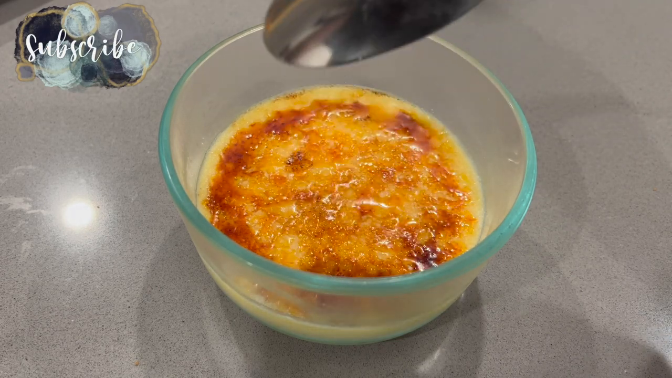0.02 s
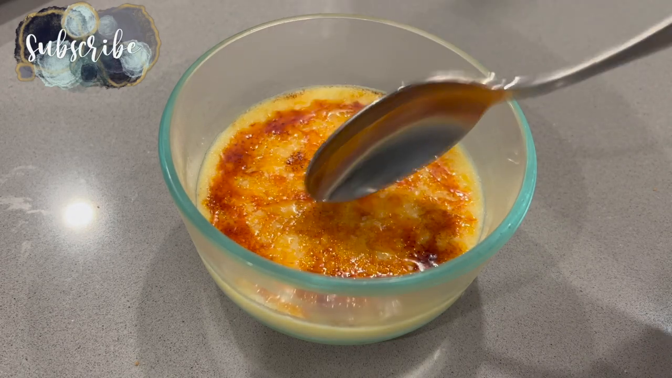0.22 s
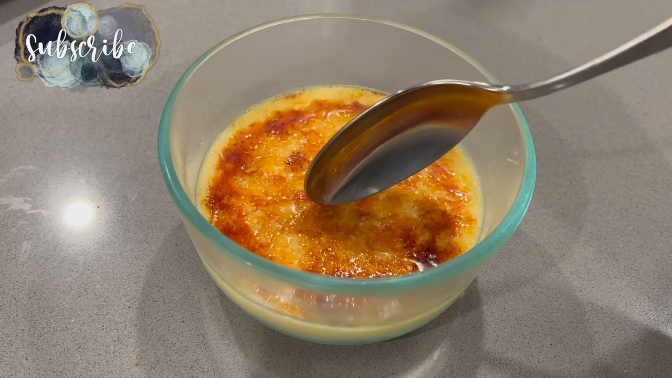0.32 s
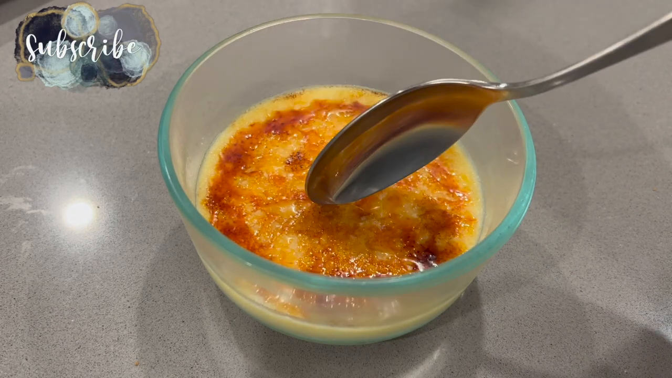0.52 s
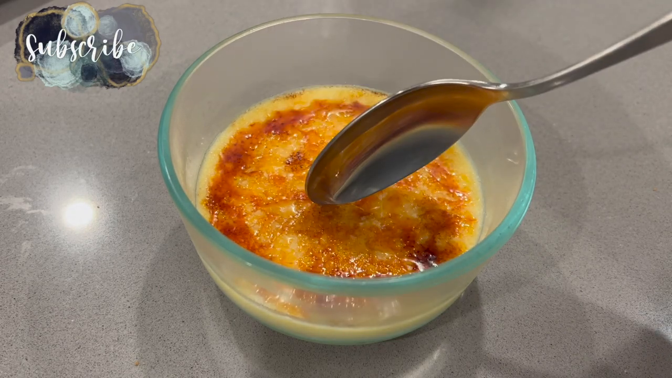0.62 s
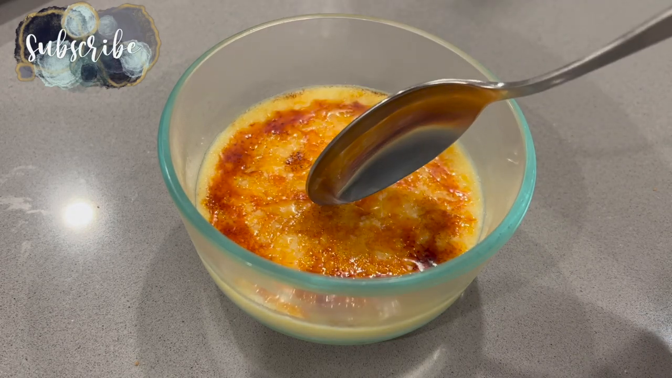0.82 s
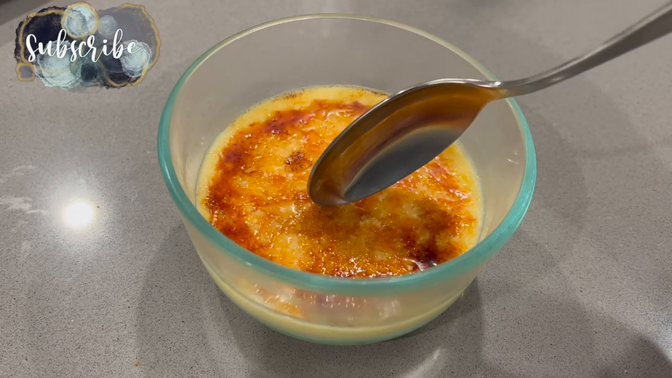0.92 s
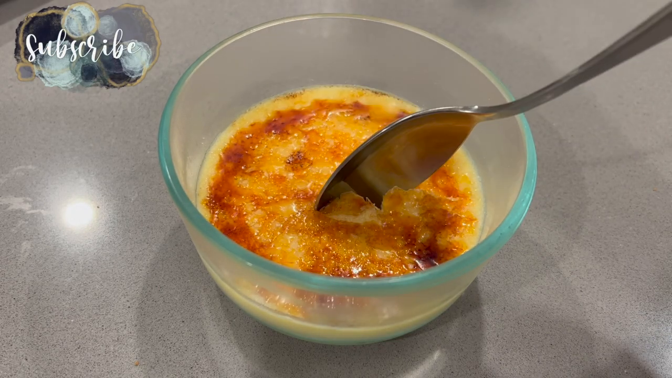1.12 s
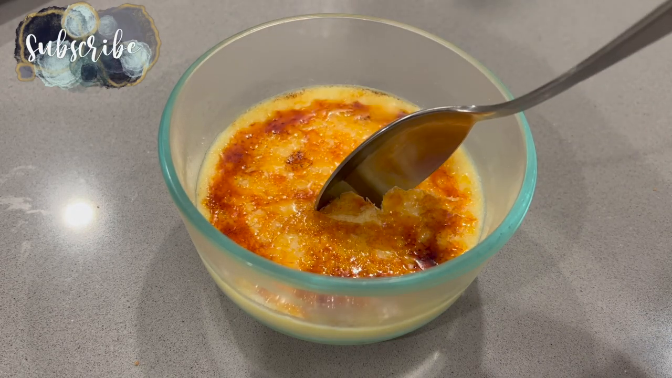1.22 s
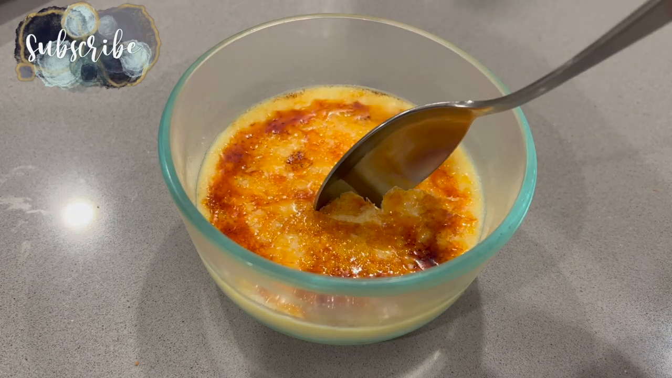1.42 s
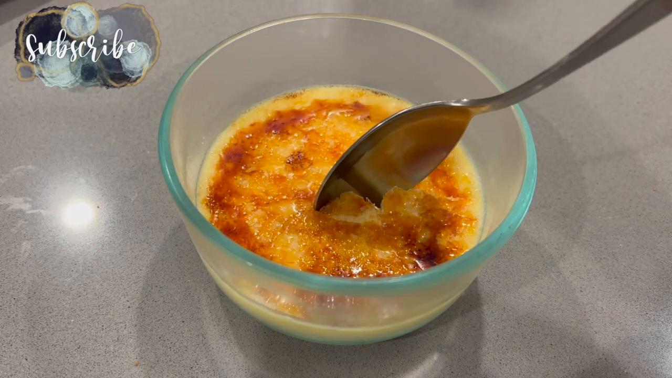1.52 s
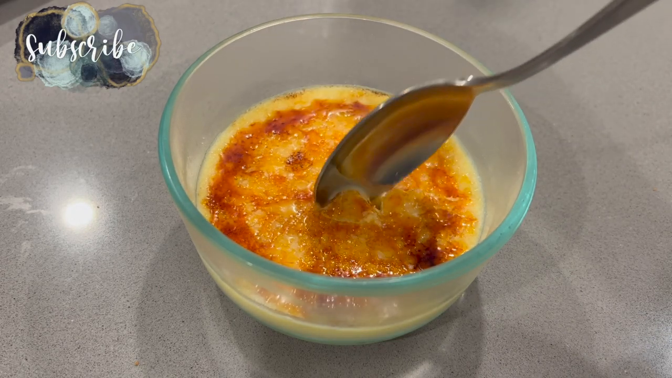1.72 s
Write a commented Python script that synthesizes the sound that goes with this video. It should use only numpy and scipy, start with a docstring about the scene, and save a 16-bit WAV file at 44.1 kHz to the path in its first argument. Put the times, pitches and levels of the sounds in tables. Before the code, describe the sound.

Close up in a lightly reverberant kitchen, a spoon knocks once on hard sugar over custard, presses with tiny crackles, then breaks it in a short crunch ending in a loud snap, over soft low appliance rush.

```python
"""A low appliance rush and hum run throughout; the kitchen answers the spoon and crust with echoes and a tail.
A steel spoon taps the caramel crust of a custard in a glass bowl, close by: crack, hollow knock and bowl thud.
It then presses on the sugar, which ticks and crackles as noise cracks, damped modes and random grains.
The crust breaks through in a short crunch of quick blows that ends in one sharp snap.
Two faint ticks follow near the end."""
import sys
import numpy as np
from scipy import signal
from scipy.fft import rfft, irfft, next_fast_len
from scipy.io import wavfile
from scipy.ndimage import map_coordinates

SR = 44100
rng = np.random.default_rng(int(sys.argv[2]) if len(sys.argv) > 2 else 0)


def dump(signal):
    """Clip the signal to [-1, 1] and save it as 16-bit WAV at the path in sys.argv[1]."""
    limited = np.clip(np.atleast_2d(signal).T, -1, 1)
    pcm = np.round(limited * 32767).astype(np.int16)
    wavfile.write(sys.argv[1], SR, pcm)


N = 77175  # length in samples


def amp(db):
    """Decibels to a linear gain."""
    return 10 ** (np.asarray(db) / 20)


def unit(x):
    """Scaled to rms 1."""
    return x / np.sqrt(np.mean(x ** 2) + 1e-20)


def burst(x):
    """Scaled to an energy of 1 per channel, averaged over the channels."""
    return unit(x) / np.sqrt(x.shape[-1])


def along(points, hz):
    """Reads (frequency [Hz], value) points on a log frequency axis."""
    f, v = np.transpose(points)
    return np.interp(np.log(hz + 1), np.log(f + 1), v)


def filtered(x, response):
    """x times a response of frequency."""
    n = x.shape[-1]
    padded = next_fast_len(n + 8192)
    spectrum = rfft(x, padded) * response(np.fft.rfftfreq(padded, 1 / SR))
    return irfft(spectrum, padded)[..., :n]


def coloured(x, points):
    """x shaped by a (frequency [Hz], level [dB]) curve."""
    return filtered(x, lambda hz: amp(along(points, hz)))


def low_cut(x, hz):
    """A second-order high-pass."""
    return signal.sosfilt(signal.butter(2, hz, "highpass", fs=SR, output="sos"), x)


def spread(pair, width):
    """Two unrelated signals as left and right; width 0 is mono."""
    mid, side = pair[0] * np.cos(width), pair[1] * np.sin(width)
    return np.array([mid + side, mid - side])


def widened(pair, widths):
    """Like spread, with a width for each frequency."""
    def mid_side(hz):
        width = along(widths, hz)
        return np.array([np.cos(width), np.sin(width)])
    mid, side = filtered(pair, mid_side)
    return np.array([mid + side, mid - side])


def wobble(rate):
    """A smooth random curve, rate knots a second."""
    knots = rng.standard_normal(int(N * rate / SR) + 4)
    return map_coordinates(knots, [np.arange(N) * rate / SR])


def ring(modes, t, rise_s, pitch=1):
    """Damped modes struck at t = 0, each a sine that dies away at its own rate."""
    t = np.maximum(t, 0)
    tone = sum(amp(db - 60 * t / t60) * np.sin(2 * np.pi * hz * pitch * t) for hz, db, t60 in modes)
    return burst(tone * (1 - np.exp(-t / rise_s)))


def add(track, s, sound):
    """Mixes a sound in at s seconds."""
    part = track[:, round(s * SR):][:, :sound.shape[-1]]
    part += sound[..., :part.shape[1]]


# spectrum of the air rush: (frequency [Hz], relative level [dB per Hz])
AIR_COLOUR = [(25, -26), (60, -10), (115, -3.5), (150, -11.5), (200, -14.5), (300, -17), (450, -27),
              (680, -25), (900, -34), (1300, -38.5), (2500, -51), (7000, -53.5), (14000, -64.5)]
# stereo width of the rush: (frequency [Hz], angle from mono [rad])
AIR_WIDTH = [(100, 0.11), (300, 0.25), (1000, 0.26), (8000, 0.46)]
# motor hum tones: (frequency [Hz], level [dB])
HUM_TONES = [(119, -62), (236, -68), (668, -78)]
AIR_DB, HUM_WAVER_DB, HUM_DRIFT_RAD = -58, 0.5, 1


def appliance():
    """A low rush of air with a motor hum whose tones waver in level and phase."""
    air = widened(coloured(rng.standard_normal((2, N)), AIR_COLOUR), AIR_WIDTH)
    t = np.arange(N) / SR
    hum = np.zeros(N)
    for hz, db in HUM_TONES:
        level = np.sqrt(2) * amp(db + HUM_WAVER_DB * wobble(19))
        hum += level * np.sin(2 * np.pi * hz * t + HUM_DRIFT_RAD * wobble(7))
    return amp(AIR_DB) * unit(air) + hum


# echoes of the nearest walls and cupboards: (delay [s], level [dB])
WALL_ECHOES = [(0.013, -19.5), (0.0192, -17.5), (0.0247, -17.5), (.0380, -28)]
# tint of those echoes: (frequency [Hz], level [dB])
WALL_COLOUR = [(100, -10), (600, 0), (1300, 9.5), (3000, 0.5), (6000, -6.5), (15000, -9)]


def early_echoes(x):
    """Each nearby surface returns a delayed, tinted copy."""
    def delays(hz):
        return sum(amp(db) * np.exp(-2j * np.pi * hz * s) for s, db in WALL_ECHOES)
    return filtered(coloured(x, WALL_COLOUR), delays)


# decay of the tail: (frequency [Hz], time to fall 60 dB [s])
ROOM_T60 = [(100, 0.54), (400, 0.38), (1200, 0.63), (3000, 0.55), (7000, .52), (10000, 0.32), (15000, 0.1)]
# spectrum of the tail: (frequency [Hz], level [dB])
ROOM_COLOUR = [(60, -17.5), (200, -9.5), (320, -1.5), (500, -7.5), (800, -7), (1200, -7), (2000, -2.5),
               (3000, -6), (4200, -3.5), (5600, -7), (7000, -6), (9000, -13), (12000, -13), (15500, -9)]
# stereo width of the tail: (frequency [Hz], angle from mono [rad])
ROOM_WIDTH = [(100, .25), (400, 0.73), (1500, 0.81)]
ROOM_RISE_S = 0.0033


def room_tail(x):
    """Diffuse reverberation: noise that dies away at its own rate in each band, fed with the mono sum."""
    hz, t, bands = signal.stft(rng.standard_normal((2, SR)), SR, nperseg=256)
    t60 = along(ROOM_T60, hz)[:, None]
    decay = amp(-60 * t / t60) * (1 - np.exp(-t / ROOM_RISE_S))
    # dividing by sqrt(t60) stops long decays from gaining energy
    tail = signal.istft(bands * decay / np.sqrt(t60), SR, nperseg=256)[1]
    tail = coloured(burst(widened(tail, ROOM_WIDTH)), ROOM_COLOUR)
    return signal.fftconvolve(x.mean(0)[None], tail, axes=1)[:, :N]


def kitchen(x):
    """Echoes of the nearest walls and cupboards, then a diffuse tail."""
    return early_echoes(x) + room_tail(x)


CRACK_WIDTH = 0.72  # rad from mono
# spectrum of breaking sugar: (frequency [Hz], relative level [dB])
CRACK_COLOUR = [(400, -13.5), (1500, -16), (3000, -0.5), (4400, -2), (5700, 1), (6800, -4.5), (8800, 4),
                (10300, -6.5), (12200, 4), (13500, -0.5), (15300, 2), (17000, -11.5)]


def sugar_colour(pair):
    """The bright spectrum of brittle sugar, spread in stereo."""
    return coloured(spread(pair, CRACK_WIDTH), CRACK_COLOUR)


# fine splintering under pressure: (time [s], level [dB])
SPLINTER_LEVEL = [(.66, -86.5), (.72, -79), (.79, -79.5), (.83, -69), (.89, -70), (.94, -62.5),
                  (.96, -42.5), (.985, -44), (1.0, -46.5), (1.02, -51), (1.07, -59.5)]
SPLINTERS_PER_S = 300


def splinters():
    """Tiny random fractures grow with the pressure on the crust, then fade after the break."""
    grains = (rng.random(N) < SPLINTERS_PER_S / SR) * rng.standard_normal((2, N))
    level_db = np.interp(np.arange(N) / SR, *np.transpose(SPLINTER_LEVEL), left=-120, right=-120)
    return amp(level_db) * unit(sugar_colour(grains))


THUD_HZ, THUD_END_HZ, THUD_GLIDE_S = 324, 42, 0.0089  # shape of the falling sine
THUD_LAG_S, THUD_RISE_S = .001, 0.0069


def thud(t):
    """A soft low bump of the bowl on the counter, its lowest part heard last, drawn as a falling sine."""
    t = np.maximum(t - THUD_LAG_S, 0)
    hz = THUD_END_HZ + (THUD_HZ - THUD_END_HZ) * np.exp(-t / THUD_GLIDE_S)
    swell = t / THUD_RISE_S * np.exp(-t / THUD_RISE_S)
    return burst(swell * np.sin(2 * np.pi * np.cumsum(hz) / SR))


CRACK_RISE_S, CRACK_T60_S = .0004, .009
CRUMBLE_DB, CRUMBLE_T60_S = -24, .035  # slower tail of the crack


def crack(t):
    """Brittle sugar gives a sharp noise burst with a fainter, longer crumble."""
    snap = amp(-60 * t / CRACK_T60_S)
    crumble = amp(CRUMBLE_DB - 60 * t / CRUMBLE_T60_S)
    rise = 1 - np.exp(-t / CRACK_RISE_S)
    return burst(rise * (snap + crumble) * sugar_colour(rng.standard_normal((2, len(t)))))


# modes of the spoon, damped by the hand: (frequency [Hz], relative level [dB], time to fall 60 dB [s])
SPOON_MODES = [(5534, -9, .045), (6944, -11.5, 0.021), (9250, 4, 0.014), (8750, -5, 0.03),
               (11580, 1.5, 0.019), (14800, -2.5, .015), (15480, -4, 0.026)]
SPOON_DB = -10.5  # beside the crack


def steel(t):
    """The crack sets the spoon ringing in short high modes."""
    return amp(SPOON_DB) * ring(SPOON_MODES, t, CRACK_RISE_S)


# rough part of a knock, at pitch ratio 1: (frequency [Hz], relative level [dB])
GRIT_COLOUR = [(150, -22), (340, -11), (560, 1.5), (900, 1), (1350, 0), (1700, -7), (2100, -8),
               (2750, -11.5), (3500, -19), (7000, -34)]
GRIT_DB, GRIT_DB_PER_PITCH, GRIT_T60_S = -5.5, 17, 0.029
GRIT_TILT_DB = 4.5  # dB per octave for each unit of pitch ratio above 1


def grit(t, pitch):
    """Noise in the knock: smaller pieces are higher, brighter and grittier."""
    lowest_hz = GRIT_COLOUR[0][0]
    tilt = GRIT_TILT_DB * (pitch - 1)
    colour = [(hz * pitch, db + tilt * np.log2(hz / lowest_hz)) for hz, db in GRIT_COLOUR]
    noise = spread(coloured(rng.standard_normal((2, len(t))), colour), CRACK_WIDTH)
    envelope = (1 - np.exp(-t / CRACK_RISE_S)) * amp(-60 * t / GRIT_T60_S)
    return amp(GRIT_DB + GRIT_DB_PER_PITCH * (pitch - 1)) * burst(envelope * noise)


# crust modes at pitch ratio 1: (frequency [Hz], relative level [dB], time to fall 60 dB [s])
CRUST_MODES = [(480, -4.5, 0.003), (783, 10, 0.0072), (1247, 1, 0.009), (1777, -16.5, 0.012),
               (2530, -19, 0.0029)]
KNOCK_LAG_S, KNOCK_RISE_S, KNOCK_LOW_HZ = .0006, 0.00018, 259
KNOCK_LEFT_DB = 1.74  # left up, right down


def knock(t, pitch):
    """The crust over the custard knocks in damped modes with grit, a little to the left."""
    modes = ring(CRUST_MODES, t - KNOCK_LAG_S, KNOCK_RISE_S, pitch)
    hollow = burst(low_cut(modes, KNOCK_LOW_HZ))
    return burst(hollow + grit(t, pitch)) * amp([[KNOCK_LEFT_DB], [-KNOCK_LEFT_DB]])


def contact(t, crack_db, knock_db, pitch):
    """Brittle sugar cracks and rings the spoon while the crust knocks."""
    return amp(crack_db) * (crack(t) + steel(t)) + amp(knock_db) * knock(t, pitch)


# the tap, then the fractures as the crust gives way:
# (time [s], crack level [dB], knock level [dB], thud level [dB], crust pitch [ratio])
BLOWS = [(.2065, 1, 10.5, 2, 0.968), (0.9491, -26.5, -19.5, -30, 2), (0.9534, -19.5, -9.5, -18, 1.25),
         (0.9581, -22.5, -7, -21, 1.6), (0.9676, -17, -12.5, -14.5, 1.1), (0.9707, -15.5, -5.5, -27.5, .9),
         (0.9758, -8.5, 2, -5.5, .95), (0.9799, -10.5, -6.5, -18.5, 0.83), (.9885, -18.5, 0, -28.5, 1.5),
         (.9945, -23, -10.5, -14, 1.3), (1.0015, 6, 9.5, -5.5, 1.45), (1.005, 3, -2.5, -10, 1.1)]
# small cracks under the spoon: (time [s], crack level [dB], knock level [dB], crust pitch [ratio])
TICKS = [(0.6669, -44, -43, 1.6), (0.678, -52.5, -35, 0.85), (0.7066, -43, -30.5, 1.49),
         (0.7311, -36, -46.5, 2.01), (0.7599, -45, -35, 1.33), (0.81, -48, -33, 1.3),
         (0.8156, -35, -29.5, 1.3), (.8250, -35, -40.5, 1.6), (.8332, -34.5, -44, 2.4),
         (.8670, -27.5, -25, 1.4), (0.8758, -32, -41, 1.3), (0.9009, -32, -43, 1.1),
         (0.9076, -48, -46, 1.7), (0.923, -36.5, -38.5, 1.7), (0.9271, -41, -38.5, 0.9),
         (0.943, -33.5, -37, 1.6), (1.5112, -61, -43, 1.5), (1.664, -48.5, -56, 1.48)]


def spoon():
    """Blows push the whole bowl against the counter; ticks stay in the crust."""
    out, t = np.zeros((2, N)), np.arange(SR // 6) / SR
    for s, crack_db, knock_db, thud_db, pitch in BLOWS:
        add(out, s, contact(t, crack_db, knock_db, pitch) + amp(thud_db) * thud(t))
    for s, crack_db, knock_db, pitch in TICKS:
        add(out, s, contact(t, crack_db, knock_db, pitch))
    return out


def scene():
    """The dessert close by, in its room, over the appliance."""
    dessert = spoon() + splinters()
    return dessert + kitchen(dessert) + appliance()


LOW_CUT_HZ, TOP_HZ, CEILING = 24, 16600, .85  # ceiling in full scale


def record(dry):
    """The microphone drops the lowest bass, rounds the highest peaks and cuts steeply above its band limit."""
    x = low_cut(dry, LOW_CUT_HZ)
    x = x / (1 + (x / CEILING) ** 6) ** (1 / 6)
    return filtered(x, lambda hz: 1 / (1 + (hz / TOP_HZ) ** 160))


dry = scene()
out = record(dry)
dump(out)
```